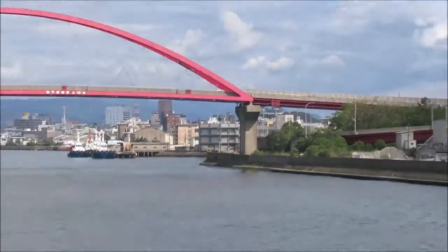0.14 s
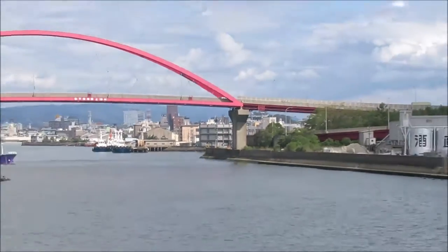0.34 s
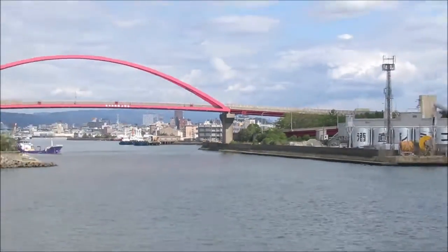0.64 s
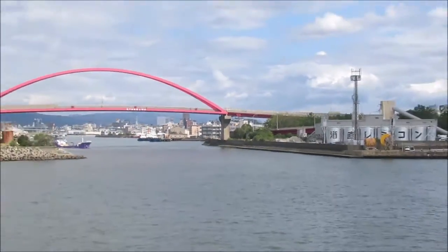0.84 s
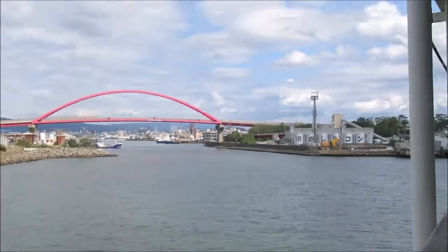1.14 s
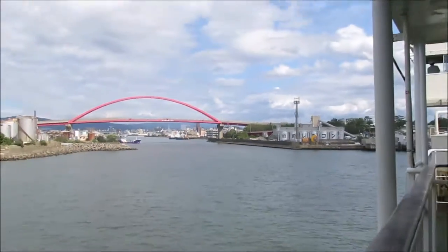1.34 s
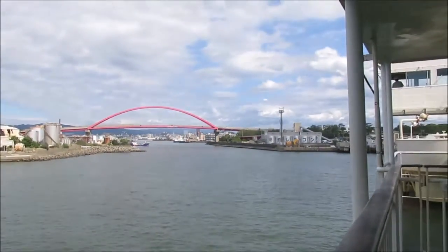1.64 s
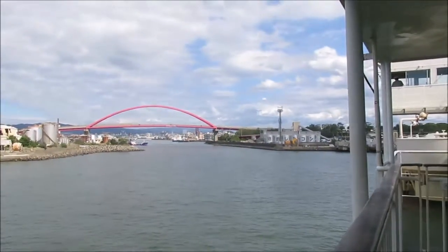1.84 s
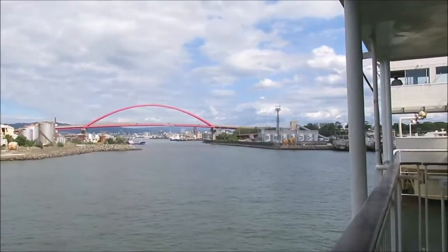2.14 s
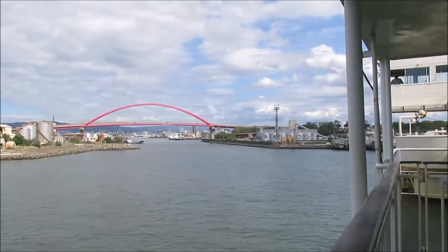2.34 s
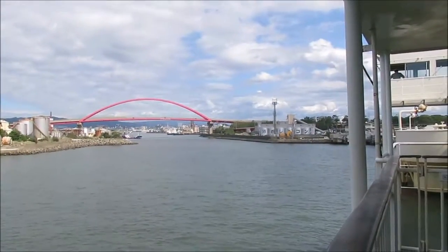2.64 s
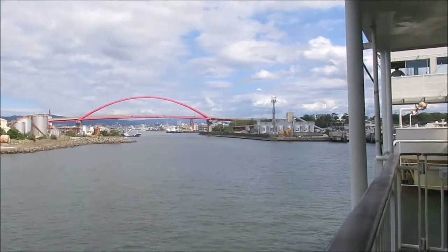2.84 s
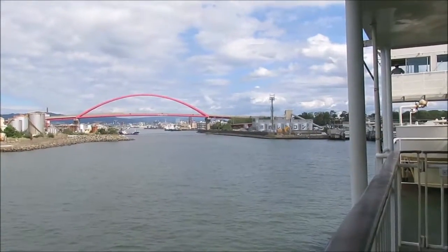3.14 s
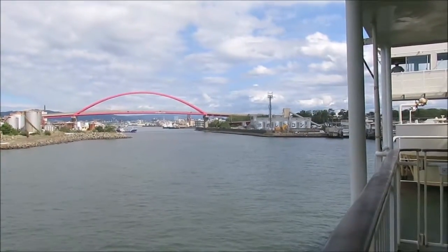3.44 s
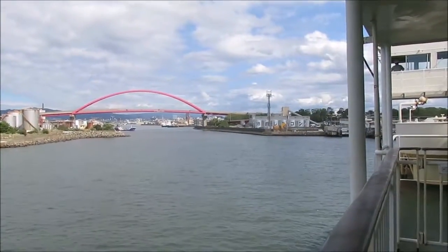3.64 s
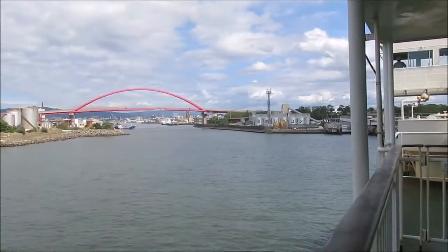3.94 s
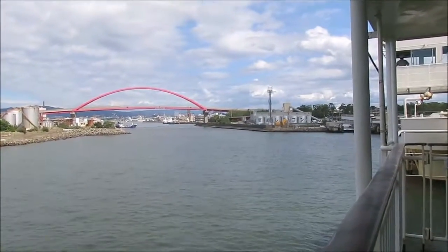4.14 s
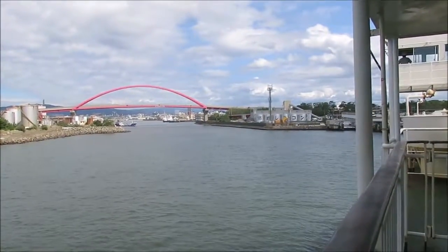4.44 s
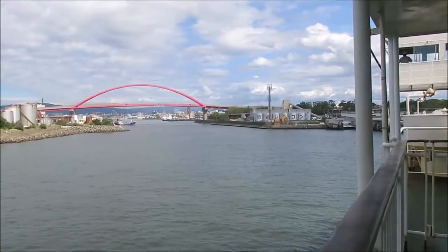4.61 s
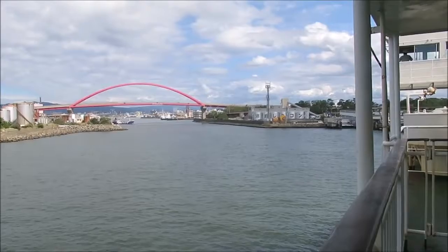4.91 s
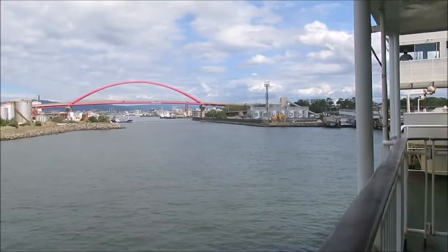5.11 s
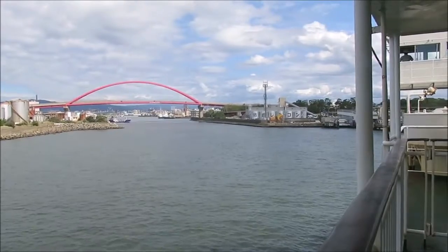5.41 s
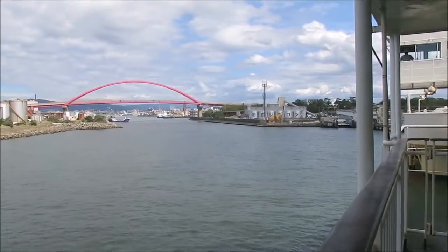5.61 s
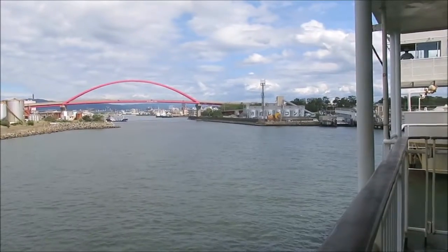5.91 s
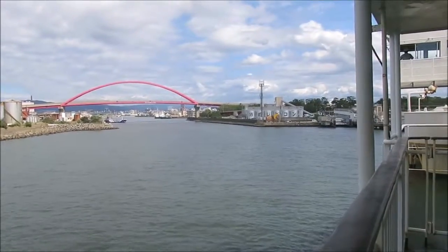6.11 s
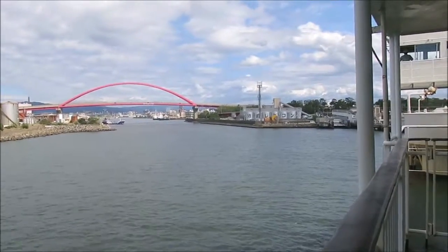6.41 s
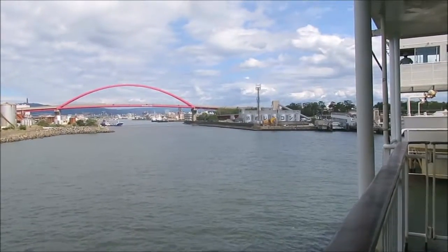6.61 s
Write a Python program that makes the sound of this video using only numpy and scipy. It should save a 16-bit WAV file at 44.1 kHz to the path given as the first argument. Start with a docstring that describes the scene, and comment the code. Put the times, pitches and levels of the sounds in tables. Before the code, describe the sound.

On the open deck of a ferry under way, two diesels throb in a low, steady drone with resonant hull and exhaust rumble. Wind buffets the handheld camera microphone in soft irregular thuds and rushes along the rail. Wash hisses very faintly. One light, dry knock comes early, then sparse tiny camera ticks in the middle and near the end.

```python
"""A ferry's main diesel drones at the open deck rail, under way in a harbour. It beats against a generator
while a gear whines faintly: each is a set of sine tones. Random noise through resonances makes the hull and
exhaust rumble. Shaped noise makes the wind buffeting the microphone, the air along the deck and the hissing
wash. Short fading sine tones make a light knock on deck and the ticks of the camera body in the hand."""
import sys
import numpy as np
from scipy import signal
from scipy.fft import rfft, irfft, next_fast_len
from scipy.io import wavfile
from scipy.ndimage import uniform_filter1d, map_coordinates

SR = 44100
rng = np.random.default_rng(int(sys.argv[2]) if len(sys.argv) > 2 else 0)


def log_audio(samples):
    """Write samples as a 16-bit WAV file to the path given in sys.argv[1]."""
    # one column per channel
    frames = np.atleast_2d(samples).T
    # limit to full scale, then quantise
    limited = np.clip(frames, -1, 1)
    pcm = np.round(limited * 32767).astype(np.int16)
    wavfile.write(sys.argv[1], SR, pcm)


N = 298116  # length in samples

# Average four-stroke cycles a second of the two engines, and gear teeth meeting a second
MAIN_HZ, GENERATOR_HZ, GEAR_HZ = 3.995, 7.487, 231.53
# Tones of each machine, before flutter and the mix: multiple_of_rate, level_db (rms)
MAIN_TONES = [(6, -26), (7, -40), (10, -32.5), (12, -25.5), (13, -28), (15, -43), (17, -26), (18, -29.5),
              (30, -30), (50, -32.5), (131, -47.5)]
GENERATOR_TONES = [(4, -34), (5, -27), (10, -27), (11, -28.5), (12, -29), (14, -32), (17, -31), (19, -28.5),
                   (20, -32.5), (21, -49), (25, -38.5), (32, -38), (35, -43), (38, -48.5), (48, -49.5),
                   (50, -46.5), (75, -44.5)]
GEAR_TONES = [(1, -34), (2, -49), (3, -49), (4, -55.5), (5, -47.7), (6, -53.2), (12, -63.5), (13, -63)]

# Resonances of hull and exhaust, before the whole is scaled: pitch_hz, width_hz, relative_level_db
HULL_RESONANCES = [(118.4, 5.5, 3), (172, 9, -0.5), (199.5, 12, 1.5), (242.3, 10, -4), (289.7, 22.3, -10.5),
                   (414.7, 17.7, -11.5), (481.7, 14, -12.5), (642, 34, -17), (780, 24, -20.5),
                   (851, 16, -20.5), (927, 31, -18), (1686, 157, -31), (2580, 210, -38)]
HULL_DB, HULL_FOLLOWS = -25, 0.58  # base level; dB gained for each dB of buffeting lift

# Noise colours, as filter shapes before each layer's level is set: frequency_hz, relative_level_db
THUD_COLOUR = [(15, -27), (30, 1.5), (50, 2), (75, -3), (110, -6), (200, -27), (500, -64), (2000, -120)]
BUFFET_COLOUR = [(30, -25), (70, -13.5), (105, -1), (140, 2), (220, -1.5), (300, -4), (390, -12.5),
                 (800, -31.5), (2000, -66), (6000, -120)]
ROAR_COLOUR = [(120, -40), (250, 0), (330, 0.5), (450, -2.5), (580, -6.5), (800, -18), (2000, -53),
               (6000, -120)]
RUSH_COLOUR = [(100, -44), (250, -6.5), (450, -3.5), (700, -1.4), (1050, -5.1), (1300, -5.9), (1500, -9.5),
               (1900, -12.9), (2700, -17.1), (4000, -26.7), (7000, -41), (15000, -74)]
HISS_COLOUR = [(800, -34), (2500, 4), (4000, 1), (5500, -3), (8000, -10), (11000, -13.5), (13500, -15),
               (15000, -29)]
# Stereo width of the noises, before gusts sway it: frequency_hz, side_minus_mid_db
STEREO_WIDTH = [(30, -42), (60, -53), (120, -50), (250, -28.5), (600, -23.5), (1260, -15.7), (2320, -10.5),
                (4280, -5), (7870, 1), (14500, 7)]

# In the event tables below, length_s is the time from the peak until a change is down to 37 percent.
# Lifts of noise layers are given before each layer's sway scales them.
# Strongest eddies on the microphone: peak_s, length_s, thud_lift_db, buffet_lift_db
EDDY_EVENTS = [(0.12, .05, 6, 6), (0.5, 0.074, 11, 3.5), (.68, .04, 5, 5), (1.28, 0.092, 9, 3),
               (1.62, 0.074, 0, 7.5), (1.8, .05, -2, 1), (2.19, .05, 10, 1.5), (2.41, 0.036, 2, 4),
               (2.81, 0.069, 1, 2), (3.02, 0.053, 3, 6.5), (3.3, .065, 10, -1), (3.72, .05, 10, -1),
               (3.87, .05, 2, 3), (4.05, 0.033, 8, 4.5), (4.78, 0.074, 4, 5), (5.41, 0.099, 3, 9.5),
               (5.53, .06, 4, -4.5), (6.02, 0.043, 10, 2), (6.68, .1, -3, 4)]
# Brief dips of the rumble (below zero is a gain): bottom_s, length_s, deep_loss_db, upper_loss_db
RUMBLE_DIPS = [(0.29, 0.11, 5, 0.5), (0.88, .05, 2, 0.5), (.99, 0.037, 1, 0.5), (1.12, .04, 2, 0),
               (1.41, 0.036, 6, 1.5), (1.63, .04, 7, 1.5), (2.39, 0.098, 6, -0.5), (2.65, .037, 0, 5),
               (3.14, .055, 10, -1.5), (3.38, .06, 1, 1), (3.6, 0.031, 1, -0.5), (4.34, 0.063, 4, 1.5),
               (4.64, .03, 7, -1.5), (5.01, 0.076, 1, 0), (5.68, .035, 6, 1), (5.82, 0.05, 2, 1),
               (6.15, 0.074, 6, 0.5), (6.3, .04, 0, 0.5), (6.53, .08, 4.5, -0.5)]
# Short gusts along the rail: peak_s, length_s, rush_lift_db, roar_lift_db
RAIL_GUSTS = [(0.08, 0.055, 1.5, 3), (0.51, .05, 2.5, -4), (1.14, .04, 4, 1), (1.25, 0.026, 4.5, 5),
              (1.64, 0.13, 2, 3), (1.92, 0.044, 4.5, 4), (2.37, .06, 1.3, -10), (2.82, 0.034, 1.5, 1.5),
              (2.95, 0.034, -0.5, -1), (3.96, .06, -1, 3.5), (4.47, 0.056, 1.5, -2), (4.83, 0.038, 1.5, 3),
              (5.36, 0.063, 1, 0), (6.69, .06, -0.5, 3.5)]
# Swells of the wash: crest_s, length_s, hiss_lift_db
WASH_SWELLS = [(0.48, .05, 3), (0.76, .045, 5.6), (1.93, .07, 3.5), (2.3, 0.074, 3.5), (2.55, .04, 3),
               (3.9, .09, 2.8), (4.36, 0.074, 3), (4.78, .05, 3), (5.2, .05, 2), (5.94, .08, 2.5),
               (6.3, .05, 1.5)]
# Strength of the wind along the side, before sway: time_s, wind_db
WIND_STRENGTH = [(0.09, -2.2), (0.21, -5), (0.48, 0.3), (0.95, -0.5), (1.6, -0.5), (2.95, 2), (3.12, -.7),
                 (3.92, 1.5), (4.22, -1), (4.43, 2.5), (4.65, -1.4), (5.1, -0.5), (5.3, 1), (5.49, 2),
                 (5.59, -3.5), (5.98, 0.9), (6.12, -2.5), (6.62, 3)]

# Contacts of a light knock and its rattle: start_s, level_db, pitch_hz
KNOCK_CONTACTS = [(1.5795, -27.5, 2200), (1.5868, -18.5, 1900), (1.5926, -30, 2700), (1.6018, -29.5, 2450)]
# Creaks of the camera body, before a shared boost: start_s, level_db, in_step_db (added to in-step modes)
CAMERA_TICKS = [(2.8132, -33, -10), (2.8987, -32, -9), (3.0364, -33, -5), (3.1992, -30, -9),
                (3.3593, -36, -16), (3.6403, -27, -9), (5.1239, -36, -9), (5.1763, -29, -1),
                (5.1909, -26.5, -2), (5.1957, -37, -6), (5.5647, -32, -14)]
# Ringing modes of that body: pitch_hz, relative_level_db, t60_s (time to fade by 60 dB),
# right_share (no unit: 1 in step with the left, -1 opposed)
CASING_MODES = [(2900, -2, .0045, 1), (4780, 0, .0045, 1), (8200, -14, .003, 1), (4500, -9, .003, -1),
                (6000, -3, .008, -1), (6900, -4, .005, -1), (10000, -11, .003, -1)]

# Base level of each noise layer in dB, before wind, lifts and sway
THUD_DB, BUFFET_DB, ROAR_DB, RUSH_DB, HISS_DB = -28.2, -23, -31, -29.2, -49.5
BUFFET_GROWS, HISS_GROWS = 1, 0.56  # dB for each dB of wind, before sway
DEEP_EDGE_HZ = 81  # where the deep bass ends
CLUMP_DB, CLUMP_RATE = .7, 30  # turbulence shared by roar and rush: depth in dB, random points a second
KNOCK_RISE_S, TICK_RISE_S = 0.00053, .0002
CEILING, TOP_HZ = .8, 15000  # where the camera rounds off peaks; its highest frequency


def amp(db):
    """Turn decibels into a gain."""
    return 10 ** (np.asarray(db) / 20)


def unit(x):
    """Scale a signal to an rms level of 1."""
    return x / np.sqrt(np.mean(x ** 2) + 1e-20)


def along(points, hz):
    """Join (frequency, value) points by lines on a log frequency axis."""
    frequency, value = np.transpose(points)
    return np.interp(np.log(hz + 1), np.log(frequency + 1), value)


def curves(rows):
    """Give one value per sample for each column after the time."""
    times, *columns = np.transpose(rows)
    return [np.interp(np.arange(N) / SR, times, column) for column in columns]


def surges(events):
    """Make a curve for each dB column that builds up to each event and dies away after it."""
    t = np.arange(N) / SR
    return sum(np.outer(dbs, np.exp(-((t - peak) / length) ** 2)) for peak, length, *dbs in events)


def wobble(rate):
    """Draw a smooth random curve through `rate` random points a second."""
    knots = rng.standard_normal(int(N * rate / SR) + 4)
    coarse = np.arange(0, N, 64)  # every 64th sample is enough for a slow curve
    smooth = map_coordinates(knots, [coarse * rate / SR])
    return np.interp(np.arange(N), coarse, smooth)


def filtered(x, response):
    """Multiply the spectrum of x by a response that depends on frequency."""
    size = next_fast_len(N + SR // 2)  # spare room for ringing
    spectrum = rfft(x, size) * response(np.fft.rfftfreq(size, 1 / SR))
    return irfft(spectrum, size)[..., :N]


def noise(colour, level_db, patchy_db, mid_sway, side_sway):
    """Make patchy stereo noise: mid is equal in both channels, side is opposed, and each sways with the level."""
    cells = signal.stft(rng.standard_normal((2, N)), nperseg=512)[2]
    patches = rng.standard_normal(cells.shape[1:])
    patches = uniform_filter1d(patches, size=8, axis=0)   # smooth over frequency
    patches = uniform_filter1d(patches, size=12, axis=1)  # smooth over time
    pair = signal.istft(cells * amp(patchy_db * unit(patches)), nperseg=512)[1][:, :N]
    mid = filtered(pair[0], lambda hz: amp(along(colour, hz)))
    side = filtered(pair[1], lambda hz: amp(along(colour, hz) + along(STEREO_WIDTH, hz)))
    gain = amp(level_db.mean()) / np.std(mid)
    gust_db = level_db - level_db.mean()
    mid = mid * amp(mid_sway * gust_db)
    side = side * amp(side_sway * gust_db)
    return gain * np.array([mid + side, mid - side])


def machine(rate_hz, tones, drift, flutter_db, flutter_rate, stray):
    """Sound multiples of an unsteady shaft rate; moving air makes each waver in level and phase (turns)."""
    turns = np.cumsum(rate_hz * (1 + drift * wobble(2.09))) / SR
    total = np.zeros(N)
    for multiple, level_db in tones:
        level = amp(level_db + flutter_db * wobble(flutter_rate))
        phase = round(multiple) * turns + rng.random() + stray * wobble(flutter_rate)
        total += level * np.sin(2 * np.pi * phase)
    return np.sqrt(2) * total  # rms levels to sine peaks


def engines():
    """Two diesels at unrelated speeds throb together under the broken whine of a gear."""
    main = machine(MAIN_HZ, MAIN_TONES, drift=0.0009, flutter_db=2.0, flutter_rate=3.664, stray=0.031)
    generator = machine(GENERATOR_HZ, GENERATOR_TONES, drift=0.0007, flutter_db=2.0, flutter_rate=4, stray=0.025)
    gear = machine(GEAR_HZ, GEAR_TONES, drift=0.001397, flutter_db=4.6, flutter_rate=12, stray=0.11)
    return main + amp(-0.1) * generator + amp(-0.5) * gear


def hull_response(hz):
    """Add the resonances of steel and exhaust, every second one with its sign flipped."""
    total = 0
    for k, (centre, width, level_db) in enumerate(HULL_RESONANCES):
        damping = 1j * hz * width
        total = total + (-1) ** k * amp(level_db) * damping / (centre ** 2 - hz ** 2 + damping)
    return total


def hull():
    """Irregular vibration keeps steel and exhaust ringing; the ring wavers and swells with the buffeting."""
    _, buffet_lift = surges(EDDY_EVENTS)
    level_db = HULL_DB + HULL_FOLLOWS * buffet_lift + 1.2 * wobble(7)
    return amp(level_db) * unit(filtered(rng.standard_normal(N), hull_response))


def buffeting():
    """Wind on the microphone makes a deep thud and a higher buffeting, both changing as eddies pass."""
    wind_db, = curves(WIND_STRENGTH)
    thud_lift, buffet_lift = surges(EDDY_EVENTS)
    thud_db = THUD_DB + BUFFET_GROWS * wind_db + thud_lift + 1.6 * wobble(14)
    buffet_db = BUFFET_DB + BUFFET_GROWS * wind_db + buffet_lift + 1.7 * wobble(14)
    thud = noise(THUD_COLOUR, thud_db, patchy_db=0.0, mid_sway=0.97, side_sway=0.79)
    buffet = noise(BUFFET_COLOUR, buffet_db, patchy_db=-0.4, mid_sway=0.68, side_sway=0.89)
    return thud + buffet


def rumble():
    """Ship and buffeting merge into one rumble whose deep and upper parts dip briefly now and then."""
    whole = engines() + hull() + buffeting()
    deep = filtered(whole, lambda hz: 1 / (1 + (hz / DEEP_EDGE_HZ) ** 8))
    upper = whole - deep
    deep_loss_db, upper_loss_db = surges(RUMBLE_DIPS)
    return amp(-deep_loss_db) * deep + amp(-upper_loss_db) * upper


def wind():
    """Air roars round the rail and rushes along the side, changing in gusts and broken into short clumps."""
    wind_db, = curves(WIND_STRENGTH)
    rush_lift, roar_lift = surges(RAIL_GUSTS)
    flow_db = wind_db + CLUMP_DB * wobble(CLUMP_RATE)
    rush_db = RUSH_DB + flow_db + rush_lift
    roar_db = ROAR_DB + flow_db + roar_lift + 1.1 * wobble(30)
    rush = noise(RUSH_COLOUR, rush_db, patchy_db=1.06, mid_sway=0.69, side_sway=0.59)
    roar = noise(ROAR_COLOUR, roar_db, patchy_db=1.2, mid_sway=0.74, side_sway=0.6)
    return roar + rush


def wash():
    """The fine hiss of the water follows the wind and rises on each swell."""
    wind_db, = curves(WIND_STRENGTH)
    swell_db, = surges(WASH_SWELLS)
    hiss_db = HISS_DB + HISS_GROWS * wind_db + swell_db + 1.1 * wobble(24)
    return noise(HISS_COLOUR, hiss_db, patchy_db=2.0, mid_sway=0.98, side_sway=.6)


def knock():
    """Something on deck knocks, light and dead, with a small rattle; each contact rings two short tones."""
    out, t = np.zeros(N + SR), np.arange(SR // 50) / SR
    envelope = t / KNOCK_RISE_S * np.exp(1 - t / KNOCK_RISE_S)
    for start, level_db, hz in KNOCK_CONTACTS:
        ring = np.sin(2 * np.pi * hz * t) + amp(-15) * np.sin(2 * np.pi * 1.74 * hz * t)
        first = round(start * SR)
        out[first:first + len(t)] += amp(level_db) * envelope * ring
    return out[:N]


def ticks():
    """Each creak rings the casing briefly; some modes push the two microphone ports opposite ways."""
    out, t = np.zeros((2, N + SR)), np.arange(SR // 50) / SR
    rise = 1 - np.exp(-t / TICK_RISE_S)
    for start, tick_db, in_step_db in CAMERA_TICKS:
        first = round(start * SR)
        for hz, mode_db, t60, right_share in CASING_MODES:
            level_db = tick_db + mode_db + in_step_db * (right_share > 0) + rng.normal(0, 1)
            ring = amp(level_db - 60 * t / t60) * rise * np.sin(2 * np.pi * hz * t)
            out[:, first:first + len(t)] += np.outer([1, right_share], ring)
    return amp(9.0) * out[:, :N]  # the shared boost


def scene():
    """Put ship and knock in the middle, with air, water and ticks in stereo."""
    return rumble() + wind() + wash() + knock() + ticks()


def record(dry):
    """The camera rounds off the tallest peaks, then keeps nothing above its band limit."""
    rounded = dry / (1 + (dry / CEILING) ** 8) ** (1 / 8)
    return filtered(rounded, lambda hz: hz < TOP_HZ)


dry = scene()
out = record(dry)
log_audio(out)
```